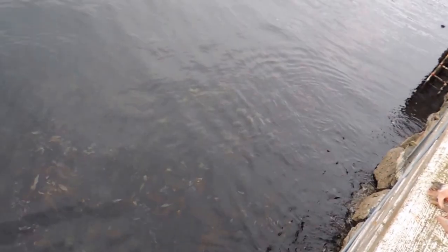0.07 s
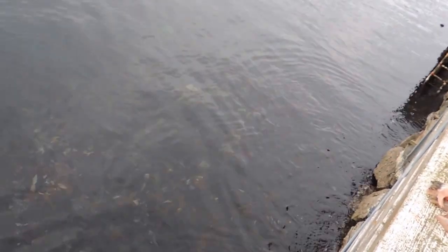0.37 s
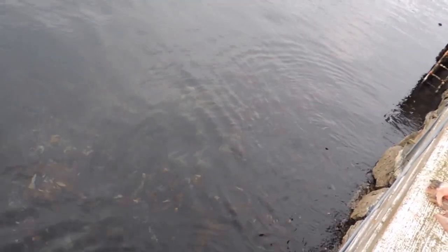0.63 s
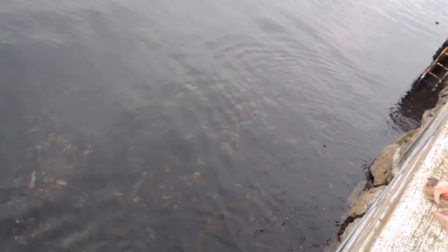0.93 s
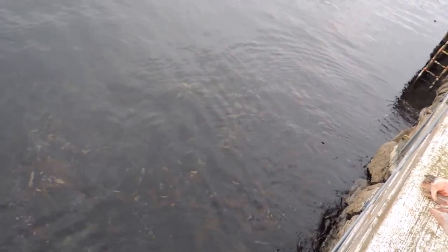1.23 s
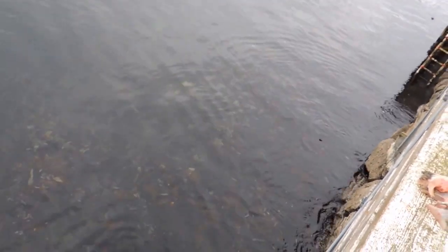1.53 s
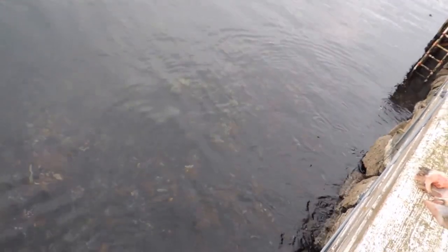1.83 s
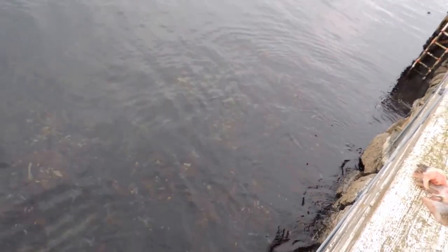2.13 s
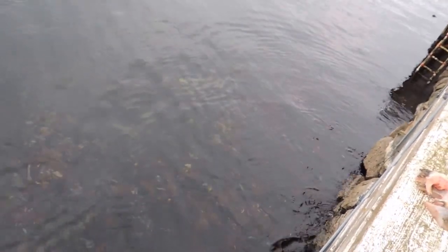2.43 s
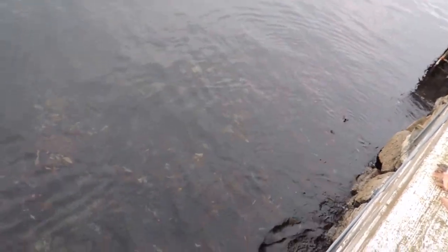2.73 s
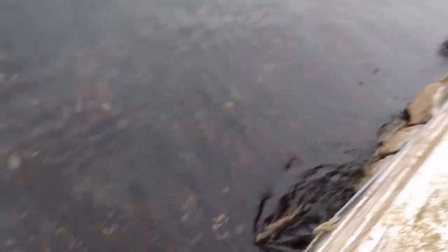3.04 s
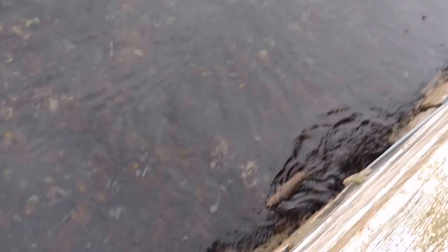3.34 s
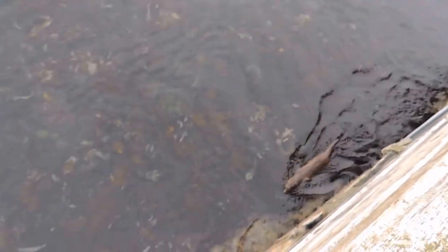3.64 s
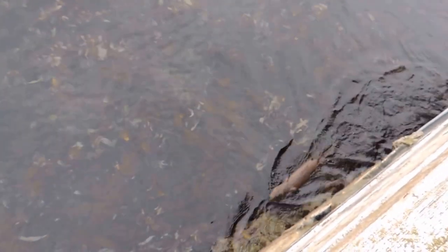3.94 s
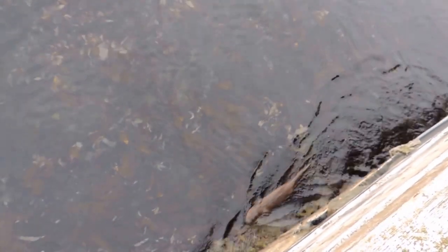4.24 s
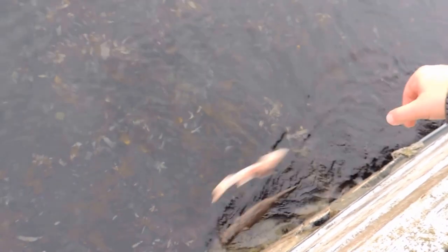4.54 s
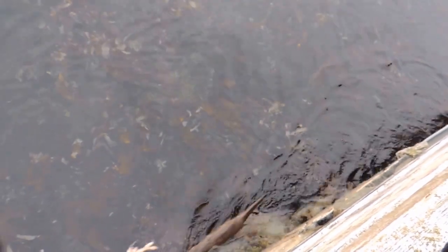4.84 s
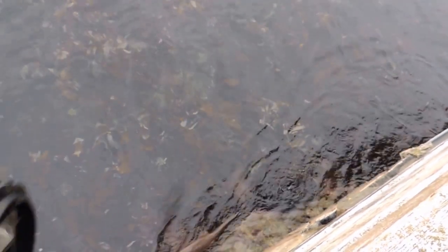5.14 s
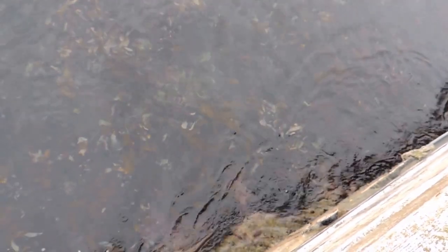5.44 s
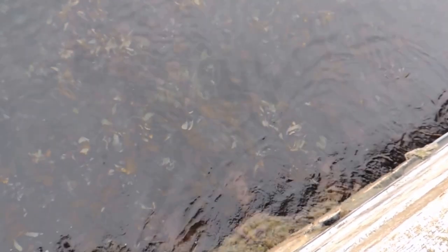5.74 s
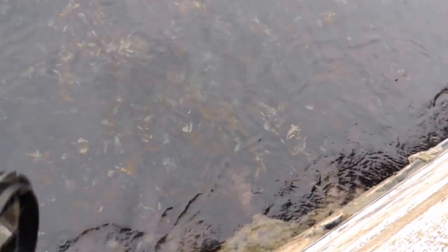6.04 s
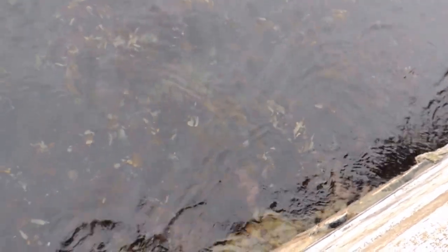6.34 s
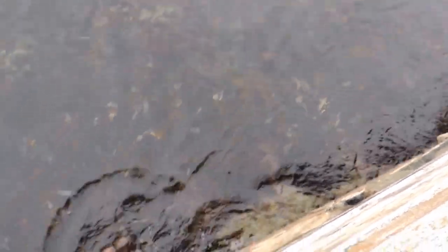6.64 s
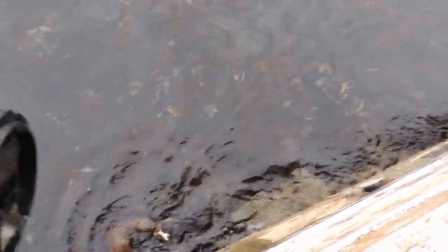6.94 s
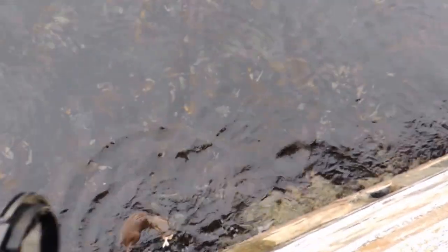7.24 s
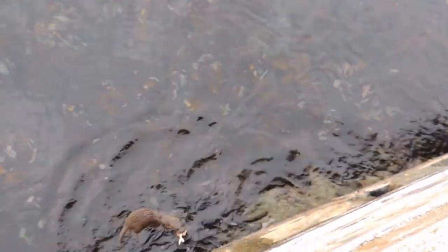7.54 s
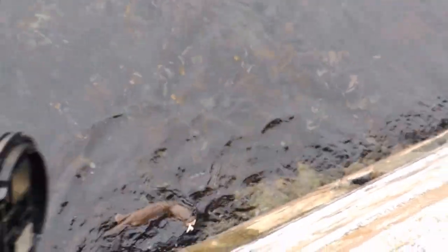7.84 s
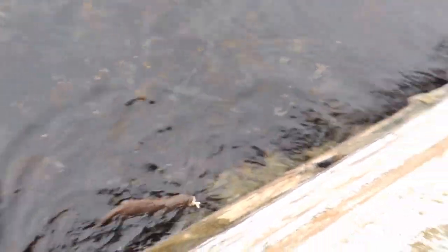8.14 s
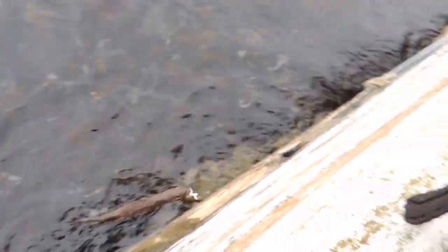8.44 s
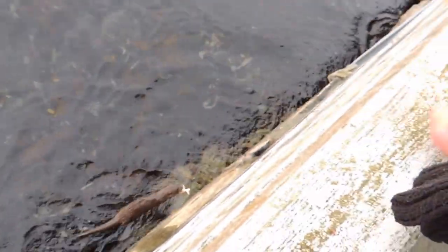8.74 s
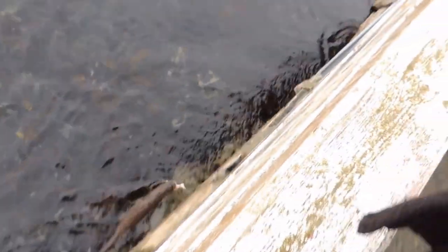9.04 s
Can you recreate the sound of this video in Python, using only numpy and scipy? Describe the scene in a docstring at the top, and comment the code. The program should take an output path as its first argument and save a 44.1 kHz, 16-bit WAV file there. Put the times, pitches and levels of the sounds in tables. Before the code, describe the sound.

Heard from the top of a rocky quay, an otter swims past just below, its wake bubbling gently on the stones. Small peeps lead to three piercing, arched whistles about a second apart, with a faint echo off the wall. Then comes the crisp slap of food landing in the water, scattered drops, and busier sloshing and gurgling. A faint low machine hum and a soft outdoor rush lie underneath throughout.

```python
"""A rocky harbour wall, the stereo microphone above the water. Close below, an otter swims past and
gives three loud, thin, arched whistles, each three harmonics over a rasp. Its wake laps and gurgles
on the stones as trapped bubbles ring; a scrap of food smacks into the water and the otter lunges
after it. The quay answers the whistles faintly, small peeps sound near and far, and a distant
machine hums under the open air."""
import sys
import numpy as np
from scipy import signal
from scipy.fft import rfft, irfft, next_fast_len
from scipy.io import wavfile
from scipy.ndimage import uniform_filter1d, minimum_filter1d, map_coordinates

SR = 44100
rng = np.random.default_rng(int(sys.argv[2]) if len(sys.argv) > 2 else 0)


def master(y):
    """Save y as 16-bit WAV."""
    cut = np.clip(np.atleast_2d(y).T, -1, 1)
    pcm = np.round(cut * 32767)  # scale
    wavfile.write(sys.argv[1], SR, pcm.astype(np.int16))


N = 400869

# The otter's whistles: t/s, lead-in/s, swell/s, length/s, top pitch/Hz, climb/Hz, lead-in/dB, crest/dB,
# sag/dB, 2nd harmonic at the crest/dB, 3rd at its brightest/dB, closing flick/dB, rasp/dB, catch/dB
WHISTLES = [(2.454, .051, .068, .186, 4736, 175, -32, -11, 19, -7.5, -20, -43, -33.5, -19),
            (3.191, .056, .056, .22, 4711, 135, -33, -4.5, 25, -14, -25, -40, -35, -21),
            (4.155, .045, .06, .195, 4712, 185, -28.5, -10, 5, -13, -23.5, -45, -40.5, -33)]
# Harmonics 1-3 as the throat closes: level over the flick/dB
CLOSED_DB = [0, 1, -11]
# Slaps and falling drops: t/s, level/dB, ring f/Hz, spatter t60/s
SPLASHES = [(.413, -30, 1190, .13), (.612, -39, 2520, .13), (.864, -27.5, 8460, .016),
            (4.441, -23.5, 2000, .05), (5.227, -22, 7000, .075), (5.2322, -5.5, 4320, .038),
            (5.241, -16.5, 3840, .053), (5.2707, -20, 2200, .06), (5.3575, -19.5, 3070, .082),
            (5.438, -25.5, 3700, .041), (5.5154, -24, 4130, .03), (5.591, -20, 1740, .046),
            (5.7678, -20.5, 10700, .028), (5.830, -16, 1544, .06), (5.919, -24, 8160, .04),
            (6.128, -25, 3440, .015), (6.1687, -25.5, 2600, .033), (6.463, -29, 4030, .017),
            (6.79, -27, 1300, .05), (7.0354, -28.5, 1840, .04), (7.149, -25.5, 1590, .075),
            (7.3327, -29, 5400, .027), (7.438, -17, 1510, .056), (7.5542, -22.5, 1850, .083),
            (7.6835, -20.5, 2340, .12), (8.385, -20.5, 1730, .056)]
# Air pockets closing between the stones: t/s, level/dB, f/Hz, ring t60/s
GLUGS = [(.206, -37, 360, .25), (.272, -36.5, 259, .16), (.363, -36.5, 565, .19), (.412, -19.5, 440, .049),
         (.416, -34, 880, .079), (.596, -22.5, 560, .1), (.614, -25.5, 567, .1), (.916, -35, 268, .066),
         (1.167, -31, 268, .05), (1.203, -29, 565, .043), (1.468, -41, 414, .25), (1.759, -35, 1200, .07),
         (1.998, -36.5, 427, .12), (2.045, -32, 431, .16), (2.115, -37, 308, .2), (2.818, -39, 480, .047),
         (2.94, -41.5, 328, .073), (2.992, -36, 756, .06), (4.016, -35, 560, .08), (4.243, -27, 641, .059),
         (4.296, -32, 936, .069), (4.912, -28.5, 700, .057), (4.968, -29, 277, .087),
         (5.023, -22, 837, .043), (5.026, -19.5, 477, .039), (5.496, -31.5, 754, .067),
         (5.587, -32.5, 454, .06), (5.761, -26, 552, .048), (5.829, -24, 827, .034),
         (5.876, -26, 1155, .056), (5.945, -32.5, 195, .2), (6.034, -30, 490, .1), (6.791, -35, 247, .085),
         (6.879, -33.5, 219, .2), (7.022, -29.5, 302, .077), (7.368, -26, 593, .071),
         (7.442, -28, 318, .12), (7.469, -18, 306, .04), (7.552, -20.5, 228, .12), (7.681, -29, 567, .04),
         (7.991, -28, 384, .061), (8.012, -33, 700, .099), (8.192, -30, 356, .07), (8.385, -26, 915, .029)]
# Wavelets breaking on the stones, before the band trims: crest t/s, rise/s, fall/s, slosh/dB,
# churn/dB, spray/dB
WAVELETS = [(.35, .1, .07, -41, -50, -53), (.55, .04, .07, -40.5, -52, -51),
            (1.08, .045, .035, -36.5, -43, -48), (1.22, .03, .035, -39.5, -48, -50),
            (2.91, .015, .04, -52, -57, -52), (3.0, .03, .06, -51, -58, -62),
            (4.012, .008, .06, -46, -48.5, -54), (4.28, .04, .05, -43.5, -45, -58),
            (4.85, .12, .12, -38.5, -44, -51), (5.0, .055, .04, -31.5, -43, -47),
            (5.255, .015, .05, -50, -44, -37.5), (5.57, .11, .045, -40.5, -45, -44),
            (5.76, .025, .04, -42, -45, -42), (5.87, .05, .05, -38, -44, -48),
            (5.98, .04, .03, -36.5, -52, -52), (6.038, .005, .045, -42, -42, -39.5),
            (6.89, .05, .04, -42, -43.5, -50), (7.14, .04, .035, -43.5, -47, -50),
            (7.39, .03, .06, -34, -42.5, -48), (7.48, .04, .06, -31.5, -42, -48),
            (7.565, .035, .075, -27, -34.5, -38), (7.68, .025, .04, -45, -43, -41),
            (8.005, .012, .065, -30.5, -43, -45.5), (8.22, .03, .06, -33, -43.5, -47.5)]
# The wash under them, before the same trims: t/s, slosh/dB, churn/dB, spray/dB
WASH = [(0, -53.5, -54.5, -55.5), (.8, -50, -55, -54.5), (1.15, -43.5, -46.5, -44.5),
        (1.6, -42.5, -46, -46.5), (2.05, -45, -49.5, -50), (2.7, -57.5, -60.5, -61),
        (3.25, -52.5, -57, -58), (3.7, -62.5, -62, -61), (3.95, -51, -53, -50.5), (4.42, -44, -49.5, -51),
        (4.62, -53, -57, -57.5), (5.2, -45.5, -50, -56), (5.35, -44.5, -46, -46.5),
        (6.1, -43.5, -43.5, -44.5), (6.45, -48.5, -44.5, -47.5), (7.25, -47.5, -49, -49.5),
        (8.45, -40, -43.5, -49), (9.09, -48, -48, -50.5)]
# Grain of the water: t/s, gain on deep bubbles/dB, gain on the finest droplets/dB
GRAIN = [(0, 5, -2.5), (1.1, -11, -4), (2.1, -9, -1), (2.8, 3, -.5), (4.9, -.5, -2.5), (5.5, 4, -1.5),
         (6.4, 0, 5), (7.5, -1.5, -4), (8.1, -2, -1.5), (8.8, 5.5, -3)]
# Faint peeps: crest t/s, f/Hz, fundamental/dB, 2nd harmonic/dB, time to fall 20 dB/s
PEEPS = [(.805, 4803, -54.5, -80, .085), (.91, 4790, -59, -80, .04), (.985, 4795, -55, -80, .045),
         (1.752, 4565, -54, -41, .03), (1.775, 4620, -46, -19, .01)]
# Spectra of the voice's rasp, three bands of water and the open air: f/Hz, relative density/dB
RASP = [(1000, -20), (2200, -13.5), (3200, -11), (4500, -6), (5300, 0), (7000, -9.5), (9500, -10),
        (11000, -10), (12500, -10), (14200, -25)]
SLOSH = [(60, -33), (130, 0.5), (200, -3), (400, -1), (650, -4), (900, -10), (1400, -27.5), (3000, -57)]
CHURN = [(400, -34.5), (750, -2.5), (1000, -2), (1700, -5.5), (2500, -7.5), (3600, -19.5), (5500, -26.5),
         (10000, -60)]
SPRAY = [(1500, -28.5), (3000, 1), (4500, -1.5), (7000, -2), (9500, -1.5), (12000, -2), (14200, -4)]
AIR = [(15, -22), (30, 1), (50, -1), (90, -3.5), (160, -10), (400, -17.5), (1000, -28.5), (3000, -25),
       (14000, -45.5)]
# Decay of the quay's answer: f/Hz, t60/s
QUAY_DECAY = [(300, .25), (2000, .3), (4700, 0.31), (9400, 0.28), (14000, .2)]
# Likeness of diffuse sound at the two microphone ports: f/Hz, correlation
PORT_LIKENESS = [(30, .6), (100, .92), (300, 0.76), (600, 0.4), (1100, .4), (2000, 0.018), (4000, .15),
                 (8000, 0.39), (14000, .2)]


def otter(jitter=.0024, shimmer_db=.54, flutter_db=1.2, rasp_growth=.95, port_lag_s=1.1e-5):
    """Close below the microphone: three harmonics, the upper two fluttering, and a rasp of effort."""
    out = np.zeros((2, N))
    for s, lead, swell, length, *voice, rasp_db, catch_db in WHISTLES:
        t = np.arange(int(length * SR)) / SR
        hz, levels = whistle_shape(t, lead, swell, length, *voice)
        phase = 2 * np.pi * np.cumsum(hz * (1 + jitter * wobble(700, len(t)))) / SR
        phase = phase + np.pi * hz * port_lag_s * np.array([[-1], [1]])  # the right port hears it first
        tone = 0
        for k, db, left_db in zip((1, 2, 3), levels, (4.5, -1.8, 2.2)):
            wavering_db = db + shimmer_db * wobble(170, len(t))
            wavering_db += (k - 1) * flutter_db * wobble(70, len(t))
            tone += amp(wavering_db) * np.sqrt(2) * np.sin(k * phase) * pan(left_db)
        effort = amp(levels[0]) + 4 * amp(levels[2])  # a pressed voice is both brighter and raspier
        rasp_gain = (effort / effort.max()) ** rasp_growth * amp(rasp_db + 1.5 * wobble(400, len(t)))
        rasp = rasp_gain * diffuse_noise(RASP, len(t))
        gate = np.minimum(1, np.minimum(t / .003, (length - t) / .0061))
        add(out, s, (tone + rasp) * gate)
        add(out, s + lead - .002, amp(catch_db) * voice_catch(2 * np.interp(lead, t, hz)))
    return out


def whistle_shape(t, lead, swell, length, top_hz, climb_hz, lead_db, crest_db, sag_db,
                  second_db, third_db, flick_db, close_s=.014, droop_hz_per_db=6.5):
    """Pitch and harmonic levels: a thin lead-in, a rising swell, a sag, a flick as the throat closes."""
    climb = np.clip((t - lead) / swell, 0, 1)
    push = np.sin(np.pi / 2 * climb) ** .8
    spent = np.maximum(0, (t - lead - swell) / (length - close_s - lead - swell)) ** 2
    arch = np.sin(np.pi * np.minimum(t / lead, 1))  # the lead-in is weaker and lower at both ends

    scoop_hz = 165 * np.exp(-t / .011)
    droop_hz = droop_hz_per_db * sag_db * spent ** 2  # the voice tires
    flick_hz = 1850 * np.exp((t - length) / .005)
    hz = top_hz - scoop_hz + 35 * arch - climb_hz * (1 - climb) - droop_hz - flick_hz

    thin_db = lead_db - 5 * (1 - arch)
    first = thin_db * (1 - push) + crest_db * push - sag_db * spent
    second = (thin_db + 6.5) * (1 - push) + second_db * push - 21 * spent ** .8
    pressed_db = np.maximum(-43, third_db - 240 * np.abs(t - lead - swell / 2))  # brightest mid-swell
    caught = np.clip((t - lead) / .004, 0, 1)
    third = (thin_db - 11.5) * (1 - caught) + pressed_db * caught
    closed = (1 + np.tanh((t - length + close_s) / .0035)) / 2
    return hz, [db + closed * (flick_db + end_db - db)
                for db, end_db in zip((first, second, third), CLOSED_DB)]


def voice_catch(hz, rise_s=.0023, noise_db=-19):
    """The voice catches with a tick as it jumps to full strength."""
    t = np.arange(SR // 50) / SR
    swell = (t / rise_s) ** 2 * np.exp(2 - 2 * t / rise_s)
    return swell * (np.sin(2 * np.pi * hz * t) + amp(noise_db) * diffuse_noise(SPRAY, len(t)))


def splashes(ring_db=-7, spatter_db=-14, crack_db=-8, width=.18):
    """A slap on the water cracks, briefly rings a small cavity and throws a spatter of spray."""
    out, t = np.zeros((2, N)), np.arange(SR // 6) / SR
    for s, db, hz, t60 in SPLASHES:
        noise = rng.standard_normal((2, len(t)))
        cavity = unit(filtered(noise, lambda f: 1 / (1 + ((f - hz) / (width * hz)) ** 2)))
        first_bubble = np.sin(2 * np.pi * hz * t * (1 + 3 * t)) * amp(-60 * t / .017)
        ring = .27 * first_bubble + cavity * amp(ring_db - 60 * t / (.65 * t60))
        spatter = diffuse_noise(SPRAY, len(t)) * min(1, hz / 3500)  # deep slaps throw less spray
        burst = amp(crack_db - 60 * t / .0024) + amp(spatter_db - 60 * t / t60)
        add(out, s, amp(db) * (ring * (1 - np.exp(-t / .00059)) + spatter * burst))
    return out


def glugs(rise=.12, thud_db=-8):
    """A pocket of air shuts with a dull thud around its own pitch and rings, rising a little."""
    out, t = np.zeros((2, N)), np.arange(SR // 6) / SR
    for s, db, hz, t60 in GLUGS:
        phase = 2 * np.pi * hz * t * (1 + rise * t / t60 / 2)
        ring = np.sin(phase + rng.normal(0, hz / 2500, (2, 1))) * amp(-60 * t / t60)
        hollow = [(hz / 4, -30), (hz / 2, -5), (hz, 0), (2 * hz, -9), (8 * hz, -45)]  # f/Hz, level/dB
        thud = diffuse_noise(hollow, len(t)) * amp(thud_db - 60 * t / .052)
        add(out, s, amp(db) * (ring + thud) * (1 - np.exp(-t / .00095)))
    return out


def wake():
    """At the foot of the wall big bubbles gurgle, smaller ones churn and droplets crackle on stone."""
    t = np.arange(N) / SR
    slosh_db, churn_db, spray_db = wavelet_levels(t)
    deep_db, fine_db = curves(GRAIN, t)
    slosh = froth(SLOSH, noise_db=-3, per_s=220, lo_hz=169.7, hi_hz=1098.4,
                  cycles=36, rise=.18, scatter_db=2.5, samples=4500)
    churn = froth(CHURN, noise_db=1.5, per_s=420, lo_hz=751, hi_hz=3315,
                  cycles=36, rise=.09, scatter_db=2.5, samples=1300)
    spray = froth(SPRAY, noise_db=2.5, per_s=900, lo_hz=3000, hi_hz=14000,
                  cycles=5, rise=.05, scatter_db=3.5, samples=140)
    slosh += (amp(deep_db) - 1) * filtered(slosh, lambda hz: 1 / (1 + (hz / 260) ** 6))
    spray += (amp(fine_db) - 1) * filtered(spray, lambda hz: 1 - 1 / (1 + (hz / 10000) ** 8))
    surge = wobble(45, N)  # the water breaks in small spurts
    return (amp(slosh_db - 2.5 + .6 * surge) * slosh
            + amp(churn_db - 1 + 1.1 * surge) * churn
            + amp(spray_db + .66 + 1.6 * surge) * spray)


def wavelet_levels(t, roundness=1.5):
    """Slosh, churn and spray in dB: every wavelet builds and drains away on top of the wash."""
    power = amp(curves(WASH, t)) ** 2
    for s, rise, fall, *band_db in WAVELETS:
        crest = np.exp(-np.maximum((s - t) / rise, (t - s) / fall) ** roundness)
        power += np.outer(amp(band_db), crest) ** 2
    return 10 * np.log10(power)


def froth(spectrum, noise_db, **kind):
    """Bubbles over the rush of the water that carries them."""
    ringing = unit(filtered(bubbles(**kind), lambda hz: amp(along(spectrum, hz))))
    return unit(ringing + amp(noise_db) * diffuse_noise(spectrum, N))


def bubbles(per_s, lo_hz, hi_hz, cycles, rise, scatter_db, samples):
    """Random bubbles ring and climb in pitch, each reaching the microphone from its own direction."""
    draws = np.random.default_rng(rng.integers(1 << 30)).random((int(per_s * N / SR), 5))
    when, pitch, strength, life, place = draws.T[..., None]
    hz = lo_hz * (hi_hz / lo_hz) ** pitch
    turns = hz * np.arange(samples) / SR
    age = turns / (cycles * (.5 + life))  # 1 when the ring has fallen 60 dB
    phase = 2 * np.pi * turns * (1 + rise * np.minimum(age, 1) / 2)
    ring = np.sin(phase) * amp(-60 * age) * (1 - np.exp(-2 * turns))
    gain = amp(scatter_db * np.minimum(-np.log(1 - strength), 3)) * hz / hi_hz
    lag = (place - .5) * 8  # samples late at one port, early at the other
    arrivals = [(when * N + 8 + side * lag).astype(int) + np.arange(samples) for side in (1, -1)]
    return unit(np.array([np.bincount(at.ravel(), (gain * ring).ravel(), N)[:N] for at in arrivals]))


def peeps(waver=.0026):
    """Faint peeps, near and far: a wavering tone and its octave swell and fade together."""
    out = np.zeros((2, N))
    for s, hz, first_db, second_db, fade in PEEPS:
        t = np.arange(-2 * fade, 2 * fade, 1 / SR)
        phase = 2 * np.pi * np.cumsum(hz * (1 + waver * wobble(195, len(t)))) / SR
        tone = amp(first_db) * np.sin(phase) + amp(second_db) * np.sin(2 * phase) * pan(-2.5)
        add(out, s + t[0], np.sqrt(2) * tone * amp(-20 * np.abs(t) / fade))
    return out


def quay_echo(voice, delay_samples=400):
    """Wall and water scatter a thin tail, a different one to each side of the microphone."""
    hz, t, noise = signal.stft(rng.standard_normal((2, SR // 2)), SR, nperseg=256)
    tail = signal.istft(noise * amp(-60 * t / along(QUAY_DECAY, hz)[:, None]), SR, nperseg=256)[1]
    response = np.pad(tail, ((0, 0), (delay_samples, 0))) / np.linalg.norm(tail[0])
    return signal.fftconvolve(voice, response, axes=1)[:, :N]


def distant_machine(hum_hz=99.9, hum_db=-53.5):
    """Far off, a machine hums on one low tone that wavers in pitch and level."""
    phase = 2 * np.pi * np.cumsum(hum_hz + .22 * wobble(1.7, N)) / SR
    return amp(hum_db + 1.1 * wobble(20, N)) * np.sqrt(2) * np.sin(phase)


def open_air(level_db=-56):
    """The low rush of open air all round the microphone."""
    return amp(level_db) * diffuse_noise(AIR, N)


def diffuse_noise(spectrum, samples):
    """Coloured stereo noise of rms 1, near mono in the bass."""
    def mid_side(hz):
        turn = np.arccos(along(PORT_LIKENESS, hz)) / 2
        return amp(along(spectrum, hz)) * [np.cos(turn), np.sin(turn)]
    mid, side = filtered(rng.standard_normal((2, samples)), mid_side)
    return unit(np.array([mid + side, mid - side]))


def amp(db):
    """Decibels to gain."""
    return 10 ** (np.asarray(db) / 20)


def unit(x):
    """Scale to rms 1."""
    return x / np.sqrt(np.mean(x ** 2) + 1e-20)


def along(points, hz):
    """Rows of f/Hz, value, read on a log frequency axis."""
    f, value = np.transpose(points)
    return np.interp(np.log(hz + 1), np.log(f + 1), value)


def curves(rows, t):
    """Each column after the time, read at times t."""
    s, *columns = np.transpose(rows)
    return [np.interp(t, s, column) for column in columns]


def wobble(per_s, samples):
    """A smooth random curve with per_s knots a second."""
    knots = rng.standard_normal(int(samples * per_s / SR) + 4)
    return map_coordinates(knots, [np.arange(samples) * per_s / SR])


def filtered(x, response):
    """Shape x by a gain that depends on frequency."""
    size = next_fast_len(x.shape[-1] + 8192)
    return irfft(rfft(x, size) * response(np.fft.rfftfreq(size, 1 / SR)), size)[..., :x.shape[-1]]


def add(track, s, sound):
    """Mix a sound into a track at time s."""
    part = track[..., round(s * SR):][..., :sound.shape[-1]]
    part += sound[..., :part.shape[-1]]


def pan(left_db):
    """Channel gains for a left-right level difference."""
    return amp([[left_db / 2], [-left_db / 2]])


def scene():
    """From the top of the wall, the otter and the water lie below and a little to the left."""
    voice = otter()
    harbour = wake() + glugs() + splashes() + distant_machine() + open_air()
    return voice + amp(-29) * quay_echo(voice) + pan(1.7) * harbour + peeps()


def record(dry, ceiling=1.0, lopsided=.036, top_hz=14300):
    """The microphone bends the loudest peaks a little, a fast limiter holds them, the top ends steeply."""
    bent = dry + lopsided * dry ** 2
    needed = np.minimum(1, ceiling / (np.abs(bent).max(axis=0) + 1e-9))
    gain = uniform_filter1d(minimum_filter1d(needed, size=260), size=260)
    return filtered(bent * gain, lambda hz: 1 / (1 + (hz / top_hz) ** 160))


dry = scene()
out = record(dry)
master(out)
```